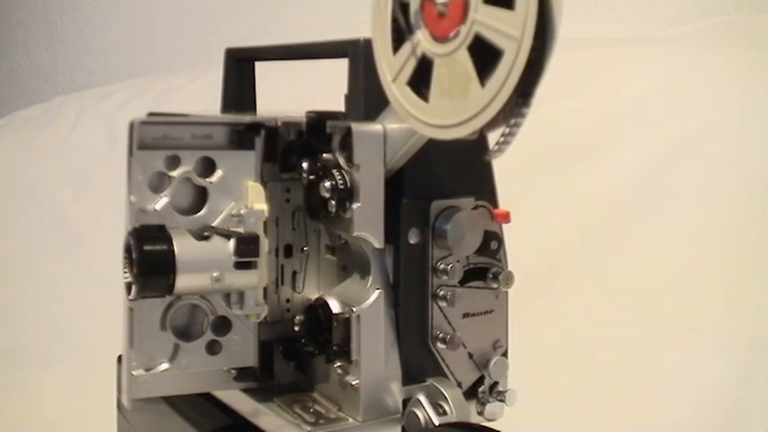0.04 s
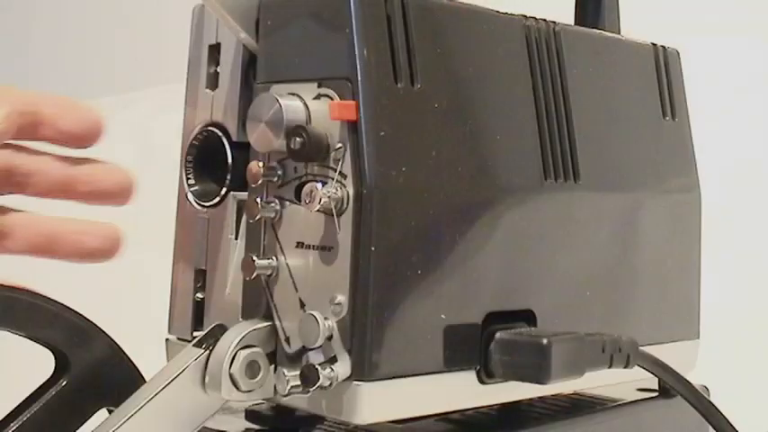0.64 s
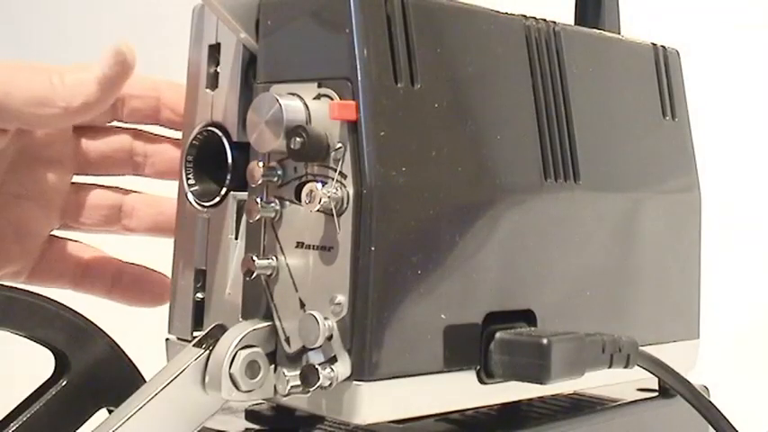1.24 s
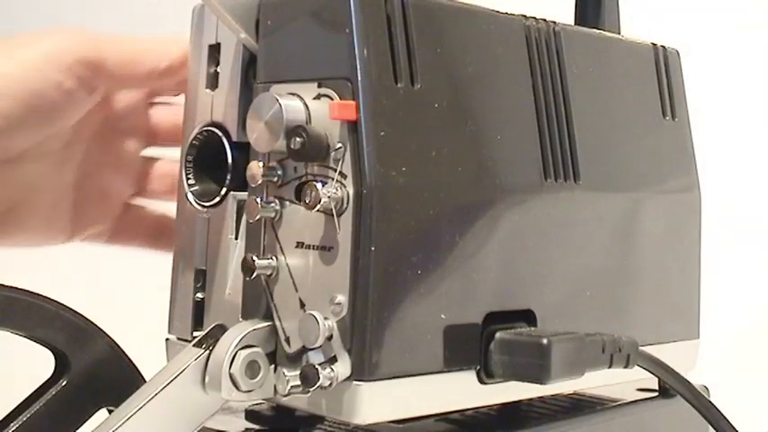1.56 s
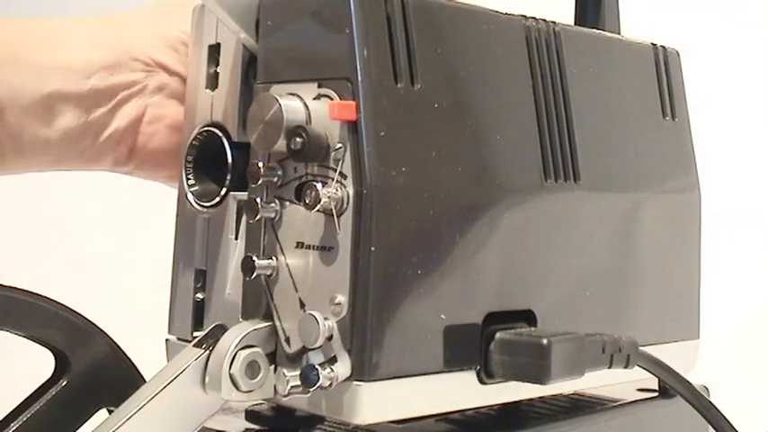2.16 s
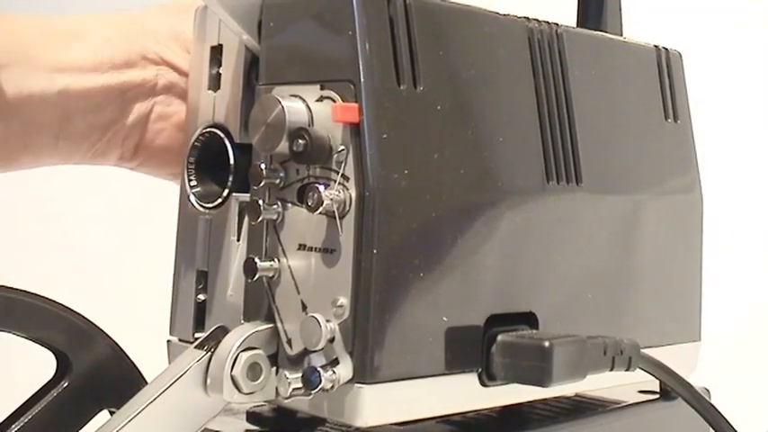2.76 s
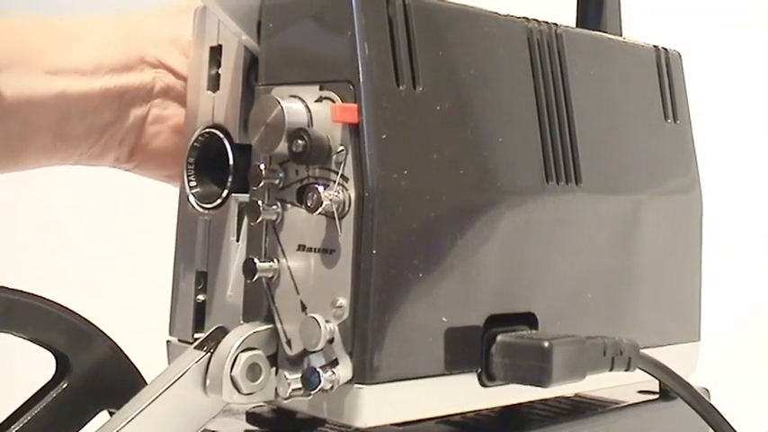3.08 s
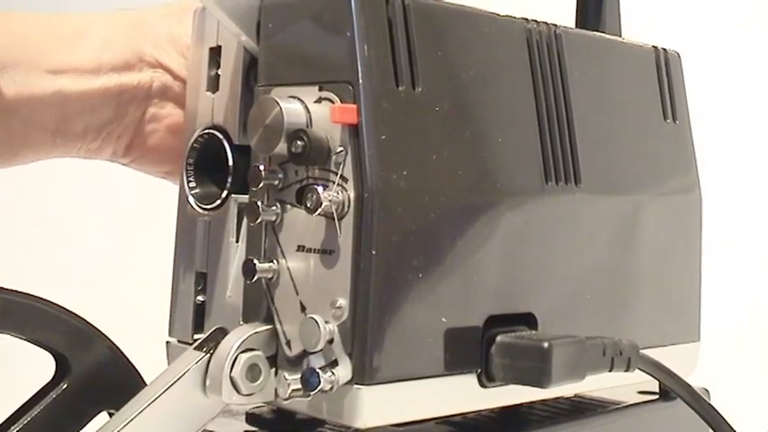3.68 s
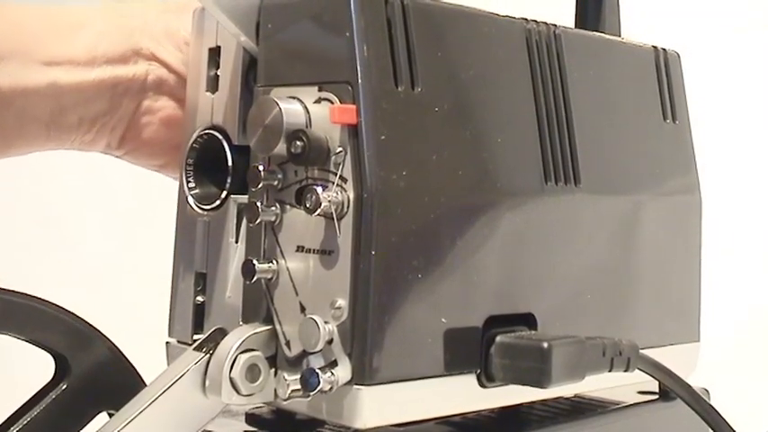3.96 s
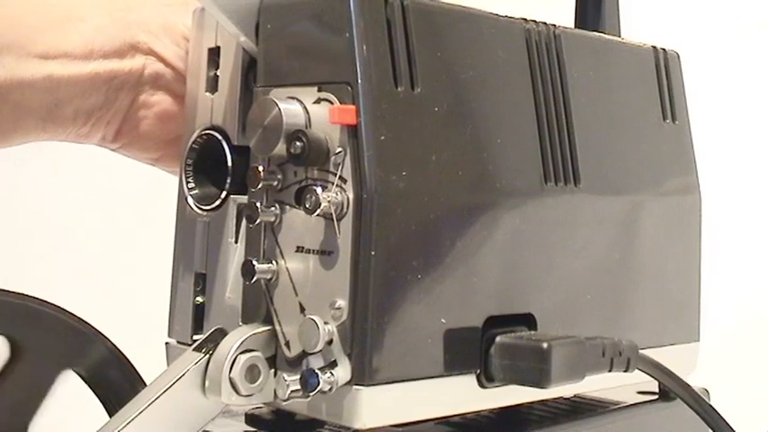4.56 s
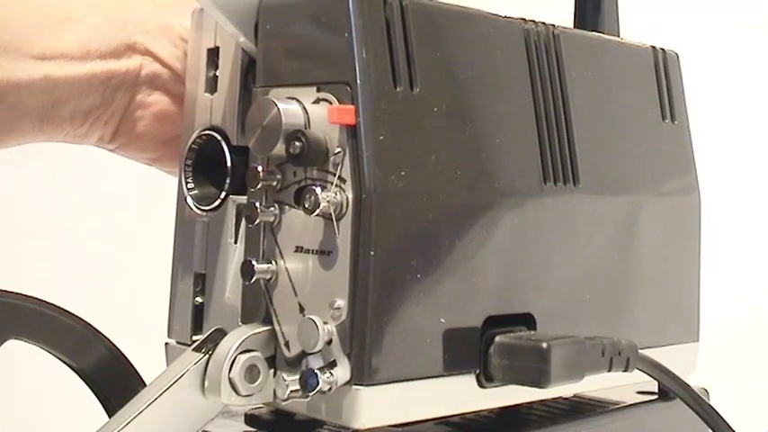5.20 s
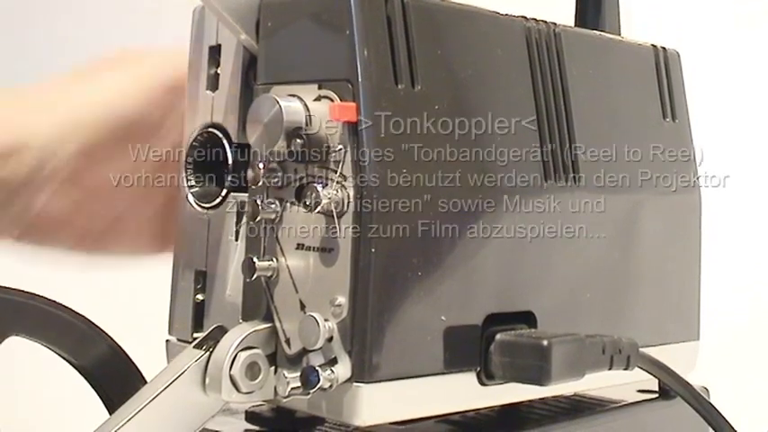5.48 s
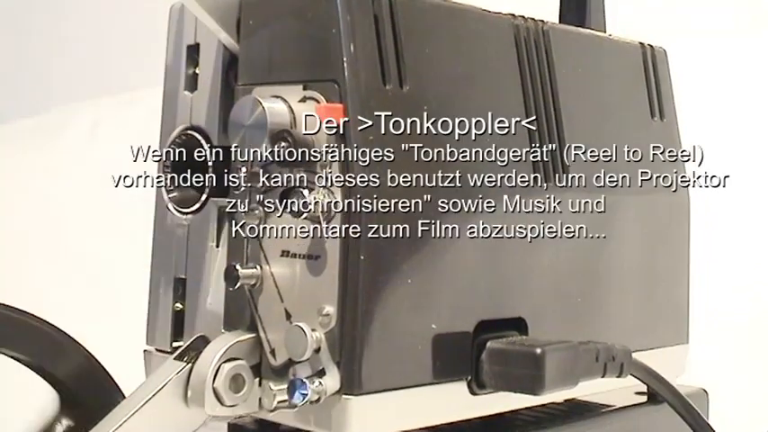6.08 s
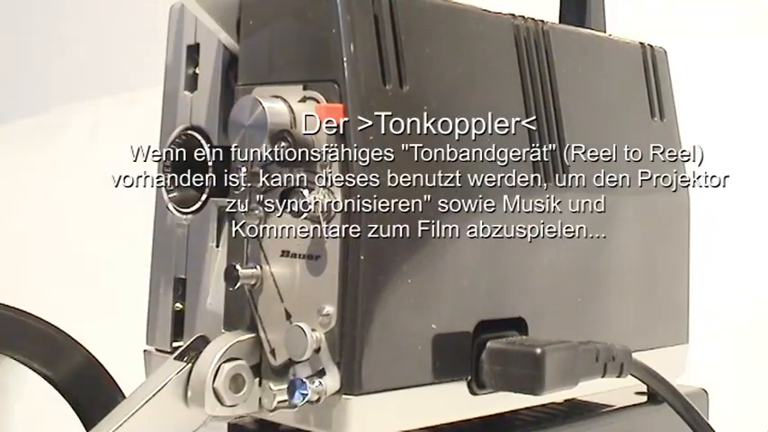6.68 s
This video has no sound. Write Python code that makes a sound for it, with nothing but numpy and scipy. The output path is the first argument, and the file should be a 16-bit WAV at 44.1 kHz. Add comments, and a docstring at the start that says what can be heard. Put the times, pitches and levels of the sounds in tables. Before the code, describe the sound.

A small film projector stands close by, a little to the right, in a quiet room. A few very faint touches on its case come first, then a crisp switch click. The machine starts at once and keeps running with a fast, even, pinging clatter over a motor hum and fan whirr. A brief low rubbing groan comes soon after the start, with a crisp film rustle around it and again near the end.

```python
"""Film projector starting up

In a quiet room, a hand brushes along a small projector's case and snaps the switch on. The motor
whines up to speed, and the claw strikes twice a frame, ticking, pinging and ringing the film gate
over the whirr of fan and gears. Something rubs against the case and groans once. The film rustles
over its guides around the groan, and again towards the end."""
import sys
import numpy as np
from scipy import signal
from scipy.fft import rfft, irfft
from scipy.io import wavfile
from scipy.ndimage import uniform_filter1d

SR = 44100
rng = np.random.default_rng(int(sys.argv[2]) if len(sys.argv) > 2 else 0)


def persist_wave(psi):
    """Save psi, clipped to +-1, as 16-bit WAV."""
    counts = np.round(np.clip(psi, -1, 1) * 32767).astype(np.int16)
    wavfile.write(sys.argv[1], SR, np.atleast_2d(counts).T)


N = 301644
T = np.arange(N) / SR
HZ = np.fft.rfftfreq(N, 1 / SR)


def amp(db):
    """Decibels to gain."""
    return 10 ** (np.asarray(db) / 20)


def unit_rms(x):
    """Scales to rms 1."""
    return x / np.sqrt(np.mean(x ** 2) + 1e-20)


def spectrum(points):
    """A frequency table's value at every frequency."""
    hz, value = np.transpose(points)
    return np.interp(np.log(HZ + 1), np.log(hz + 1), value)


def peaks(rows):
    """Bell-shaped resonances as an EQ curve in dB."""
    return sum(db / (1 + (2 * (HZ - hz) / width) ** 2) for hz, width, db in rows)


def curves(rows):
    """The columns of a time table at every sample."""
    times, *columns = np.transpose(rows)
    return [np.interp(T, times, column) for column in columns]


def add(mix, s, sound):
    """Mixes a sound in at time s."""
    part = mix[..., round(s * SR):][..., :sound.shape[-1]]
    part += sound[..., :part.shape[-1]]


def eq(x, db):
    """Filters by a gain at every frequency."""
    return irfft(rfft(x) * amp(db), N)


def strike(t, rise, decay):
    """Envelope of a blow."""
    return (1 - np.exp(-t / rise)) * np.exp(-t / decay)


def grain(samples):
    """Smoothed noise at rms 1, for roughening a level."""
    return unit_rms(uniform_filter1d(rng.standard_normal(N), size=samples))


# Stereo focus of the projector: (frequency [Hz], left-right correlation [-1 to 1])
PROJECTOR_FOCUS = [(60, 0.66), (130, 0.67), (290, 0.27), (640, 0.6), (1410, 0.71), (3100, 0.99),
                   (6820, 0.75), (15000, 0.037)]

def noise(db, focus=PROJECTOR_FOCUS):
    """Coloured stereo noise whose mono mix has rms 1."""
    a, b = rfft(rng.standard_normal((2, N)))
    correlation = np.clip(spectrum(focus), -.8, 1)
    mid, side = a * np.sqrt(1 + correlation), b * np.sqrt(1 - correlation)
    pair = irfft(np.array([mid + side, mid - side]) * amp(db) / np.sqrt(1 + correlation), N)
    return pair / pair.mean(0).std()


def reverb(x, t60, wet_db):
    """Adds a small room's scattered reflections, different left and right."""
    t = T[:SR // 2]
    taps = rng.choice([-1., 1.], (2, len(t))) * (rng.random((2, len(t))) < .1)
    taps *= (t > .004) * amp(-60 * t / t60)
    taps /= np.linalg.norm(taps, axis=1, keepdims=True)
    return x + amp(wet_db) * signal.fftconvolve(x, taps, axes=1)[:, :N]


# Colours of the opening hiss and the quiet bed: (frequency [Hz], gain [dB])
OPENING_EQ = [(15, -37), (25, -8), (71, -10), (112, -3), (271, -12), (394, -7.5), (729, -10.5), (1420, -9),
              (1720, -11.5), (3010, -12), (5720, -13), (7890, -21.5), (15000, -26)]
BED_EQ = [(20, -12), (70, -6.5), (118, 1), (170, -7), (400, -6), (800, -7), (1200, -7.5), (1480, -5),
          (1750, -9), (4600, -8), (5900, -10.5), (6700, -14), (8200, -19.5), (15000, -23)]
# The opening hiss drops away; the bed comes in and dips briefly: (time [s], gain [dB])
OPENING_FADE = [(0, 0.5), (.3, 0.5), (.47, -3.5), (.485, -26)]
BED_FADE = [(.47, -21), (.485, -1.5), (.515, -6), (.53, 0.5), (3.2, 0)]
# Resonances in both: (frequency [Hz], width [Hz], gain [dB])
HISS_PEAKS = [(111, 24, 2), (1466, 99, 5.5), (5500, 140, 7), (5750, 124, 8), (6030, 120, 3.5)]
# Stereo focus of the room: (frequency [Hz], left-right correlation [-1 to 1])
ROOM_FOCUS = [(60, -0.63), (130, -0.75), (290, -0.79), (640, -0.6), (1410, 0.17), (3100, 0.44),
              (6820, 0.26), (15000, -0.19)]

def room_tone(opening_db=-59.5, bed_db=-65.5, hum_hz=120, hum_db=-81.5):
    """A wide hiss, louder for the first half second, and a faint hum."""
    opening = noise(spectrum(OPENING_EQ) + peaks(HISS_PEAKS), ROOM_FOCUS)
    opening *= amp(opening_db + curves(OPENING_FADE)[0])
    bed = noise(spectrum(BED_EQ) + peaks(HISS_PEAKS), ROOM_FOCUS)
    bed *= amp(bed_db + curves(BED_FADE)[0])
    hum = amp(hum_db) * np.sqrt(2) * np.sin(2 * np.pi * hum_hz * T)
    return opening + bed + hum


# Touches on the case: (time [s], level [dB], pitch [Hz], decay [s], bandwidth [share of pitch])
TOUCHES = [(.734, -71, 8000, .012, .3), (.847, -58.5, 2800, .012, .8), (.877, -62, 1800, .012, 0.54),
           (0.944, -56.5, 335, 0.018, 0.1), (.945, -56, 1260, 0.0092, 0.88), (0.995, -63, 600, 0.015, 1),
           (1.148, -60.5, 1100, 0.0089, 0.98), (1.422, -65, 700, .012, .9)]
# Slides along it: (time [s], length [s], level [dB])
SLIDES = [(.52, 0.76, -80), (1.36, 0.25, -75.5), (2.28, 0.62, -73.5)]
# Their dull resonance: (frequency [Hz], width [Hz], gain [dB])
SLIDE_PEAK = [(382, 230, 34)]

def hand():
    """Soft touches, each a puff of noise around one pitch, and faint slides along the case."""
    touches, sliding = np.zeros((2, N))
    t = T[:SR // 8]
    for s, db, hz, decay, width in TOUCHES:
        band = signal.iirpeak(hz, 1 / width, fs=SR)
        puff = unit_rms(signal.filtfilt(*band, rng.standard_normal(len(t)), padtype=None))
        add(touches, s, amp(db) * strike(t, 0.00087, decay) * puff)
    for s, length, db in SLIDES:
        add(sliding, s, amp(db) * np.hanning(round(length * SR)))
    return touches + sliding * noise(peaks(SLIDE_PEAK))


# Switch clicks: (time [s], level [dB], snap decay [s], brightness [0 to 1])
CLICKS = [(3.259, -36, 0.0062, 0.55), (3.279, -40.5, 0.0056, 0.82), (3.336, -38, 0.0045, 0.77),
          (3.3396, -22.5, 0.0058, 1), (3.350, -37, 0.0038, 0.94), (3.3605, -51, 0.0093, 1)]
# Colours of the bright snap and the panel's dull clack: (frequency [Hz], gain [dB])
SNAP_EQ = [(100, -29), (600, -23), (1010, 2), (1700, -3.5), (2900, 2.5), (3400, -7), (3900, -1),
           (4400, -5.5), (5400, 1.5), (6400, -0.5), (8000, -11.5), (11000, -22), (15000, -30)]
CLACK_EQ = [(30, -18), (120, -7), (400, 2), (1300, -4.5), (3400, -0.5), (5000, -10), (10000, -27)]
# Panel resonances: (frequency [Hz], width [Hz], gain [dB])
PANEL_PEAKS = [(86, 18, 15), (170, 50, -3), (781, 90, 15), (1000, 58, 14.5), (1900, 500, 13),
               (3050, 180, 11.5)]

def switch(snap_rise_s=0.00021):
    """The knob leaves its detent, then the contact snaps home and rattles; each blow clacks the panel."""
    t = T[:SR // 5]
    snaps, clacks = np.zeros((2, N))
    attack = 1 - np.exp(-t / snap_rise_s)
    for s, db, decay, bright in CLICKS:
        bright = min(bright, .99)
        add(snaps, s, amp(db) * bright * attack * np.exp(-(t / decay) ** 2))
        add(clacks, s, amp(db) * np.sqrt(1 - bright ** 2) * strike(t, rise=0.0007, decay=0.02))
    clicks = snaps * noise(spectrum(SNAP_EQ)) + clacks * noise(spectrum(CLACK_EQ) + peaks(PANEL_PEAKS))
    return reverb(clicks, t60=0.33, wet_db=-14)


# Thin colour of the detent spring: (frequency [Hz], gain [dB])
SPRING_EQ = [(1500, -30), (3400, 0), (8000, -7), (11000, 2), (15000, -6)]

def detent(level_db=-47):
    """The spring ticks brightly with the first two clicks of the knob."""
    envelope = np.zeros(N)
    for s, *_ in CLICKS[:2]:
        add(envelope, s, amp(level_db) * strike(T[:SR // 20], rise=.0002, decay=.004))
    return envelope * noise(spectrum(SPRING_EQ))


POWER_ON_S, FIRST_STROKE_S, RUNNING_FPS = 3.338, 3.419, 16.9
# Film speed, which times the claw and pitches motor and gears: (time [s], rate [frames/s])
FILM_SPEED = [(3.35, 7.938), (3.5, 16.928), (4.2, 16.981), (4.65, 16.769), (5.1, 16.892), (5.8, 16.866),
              (5.87, 16.508), (5.98, 17.025), (6.84, 17.067)]

def speed():
    """The drive's speed as a share of its running speed."""
    return curves(FILM_SPEED)[0] / RUNNING_FPS


def frames():
    """Frames of film moved since the claw's first stroke."""
    count = np.cumsum(speed()) * RUNNING_FPS / SR
    return count - np.interp(FIRST_STROKE_S, T, count)


def stroke_times():
    """The claw strikes every half frame, in and out by turns."""
    count = frames()
    return np.interp(np.arange(0, count[-1], .5), count, T)


def drive_gain(trim_db=.5, db_per_octave=10.5, db_per_s=0.3):
    """The drive gets louder with speed, and creeps up as it runs on."""
    db = trim_db + db_per_octave * np.log2(speed()) + db_per_s * (T - POWER_ON_S)
    return amp(db) * (T > POWER_ON_S)


# Mains hum, strongest while the motor starts: (time [s], level [dB])
MOTOR_HUM = [(3.335, -95), (3.36, -57), (3.5, -52), (3.62, -61.5), (5.8, -61.5), (6.2, -65), (6.84, -65)]

def motor(whine_hz=559.7, whine_db=-52.5, db_per_octave=32, waver=0.0017, hum_hz=100):
    """A wavering whine that climbs and swells with speed, over the hum of the windings."""
    wander = noise(spectrum([(8, 5), (40, -29), (200, -90)]))[0]
    cycles = np.cumsum(whine_hz * speed() * (1 + waver * wander)) / SR
    whine = amp(whine_db + db_per_octave * np.log2(speed())) * np.sin(2 * np.pi * cycles)
    hum = amp(curves(MOTOR_HUM)[0]) * np.sin(2 * np.pi * hum_hz * T)
    return np.sqrt(2) * (whine + hum) * (T > POWER_ON_S)


# Colour of fan and gears: (frequency [Hz], gain [dB])
WHIRR_EQ = [(20, -36), (48, -12.5), (62, -28), (88, -4), (125, -11), (270, -6.5), (350, -8.5), (620, 0.2),
            (1200, -6.5), (2400, 0.5), (4200, -10.5), (6200, -11.5), (8400, -27), (15000, -41)]
# Case resonances: (frequency [Hz], width [Hz], gain [dB])
CASE_PEAKS = [(85.02, 15, 2.5), (180, 24, 5), (298, 87, 4.5), (766.5, 56, 8), (940, 83, 6),
              (1014, 41, 10.5), (1352, 135, 7), (1530, 54, -4), (2994, 174, 14), (3260, 49, -3),
              (3600, 57, 7.5), (4290, 54, 6.5), (5460, 160, -1), (6240, 130, 3.5)]

def whirr(air_db=-47.5, rattle_db=-49.5, throb_db=1.4, grit_db=1.5):
    """Fan air and a gear rattle that comes round every frame, both sounding through the case."""
    colour_db = spectrum(WHIRR_EQ) + peaks(CASE_PEAKS)
    one_turn = rng.standard_normal(round(SR / RUNNING_FPS))
    rattle = np.zeros(N)
    for s in stroke_times()[::2]:
        add(rattle, s, one_turn)
    # the rattle has a slightly softer top than the air
    rattle = eq(rattle, colour_db + spectrum([(1400, -1.5), (3000, -1), (6000, -3.5)]))
    rattle /= rattle[T > FIRST_STROKE_S].std()
    load = np.cos(2 * np.pi * (2 * frames() - .25))  # one throb per claw stroke
    envelope = drive_gain() * amp(throb_db * load + grit_db * grain(samples=130))
    return envelope * (amp(air_db) * noise(colour_db) + amp(rattle_db) * rattle)


# Gear tones: (pitch at running speed [Hz], relative level cold [dB], relative level warm [dB])
GEAR_TONES = [(188, -76, -72), (614, -63, -64.5), (780, -61.5, -71), (776, -78, -61.5), (916, -72, -64.5),
              (1009, -59, -66.5), (1344, -78, -58.5)]

def gear_tones(warm_from_s=4.1, warm_by_s=6.37, sway_rad=0.097):
    """Meshing teeth sing in step with the film's speed; their balance shifts as the drive warms up."""
    run_s = frames() / RUNNING_FPS
    warmth = np.interp(T, [warm_from_s, warm_by_s], [0, 1])
    sway = sway_rad * noise(spectrum([(10, -8), (60, -31), (300, -92)]))[0]
    tones = np.zeros(N)
    for hz, cold_db, warm_db in GEAR_TONES:
        level = amp(cold_db + (warm_db - cold_db) * warmth)
        tones += level * np.sin(2 * np.pi * (hz * run_s + rng.random()) + sway)
    return np.sqrt(2) * tones * drive_gain()


def squeak(start_s=3.405, length_s=0.046, level_db=-52, pitch_hz=5600, width_hz=300):
    """The mechanism chirps faintly as it starts to turn."""
    envelope = np.zeros(N)
    add(envelope, start_s, amp(level_db) * np.hanning(round(length_s * SR)))
    band_db = -20 * np.log10(1 + (2 * (HZ - pitch_hz) / width_hz) ** 2)
    return envelope * noise(band_db)


# How the claw meets the film going in, and coming out half a frame later:
# (time [s], relative ping level [dB], ping pitch [Hz], relative tick level [dB])
CLAW_IN = [(3.42, -44, 2400, -51), (3.49, -30, 2270, -46.5), (3.67, -40, 2370, -45.5),
           (3.89, -42.5, 2420, -47), (4.22, -31.5, 2300, -42.5), (4.48, -34, 2320, -45),
           (4.84, -48, 2460, -42.5), (4.98, -33.5, 2287, -46), (5.3, -28, 2340, -43.5),
           (5.39, -42, 2320, -47), (5.55, -33, 2320, -45), (5.63, -39, 2710, -44.5), (5.85, -40, 2430, -46),
           (6.05, -32.5, 2370, -45), (6.25, -32.5, 2340, -40), (6.4, -32, 2410, -47),
           (6.68, -36.5, 2210, -43.5), (6.82, -47, 2240, -50)]
CLAW_OUT = [(3.45, -34, 2070, -59), (3.58, -40, 2200, -51.5), (3.72, -35.5, 2310, -46),
            (3.93, -32, 2115, -54), (4.22, -29, 2196, -48.5), (4.32, -30.5, 2440, -51),
            (4.57, -32, 2404, -45), (4.66, -30.5, 2374, -42), (5.1, -29, 2383, -41),
            (5.4, -31, 2430, -49.5), (5.68, -33, 2446, -41), (5.83, -29.5, 2396, -39),
            (5.9, -32.5, 2210, -44), (6.06, -36, 2330, -42), (6.42, -44, 2470, -44.5),
            (6.54, -31, 2400, -42), (6.84, -29.5, 2250, -47.5)]
# Spells when every other stroke knocks hard: (time [s], length [s], ping boost [dB])
KNOCKING = [(4.76, .39, 7), (5.709, .15, 8), (6.154, .15, 6)]

def strokes(ping_scatter_db=1.7, pitch_scatter=0.022, tick_scatter_db=1.5):
    """Yields each claw stroke's time, ping level, pitch and tick level, no two quite alike."""
    times = stroke_times()
    boost_db = np.zeros(len(times))
    for start, length, db in KNOCKING:
        first, end = np.argmin(abs(times - start)), np.searchsorted(times, start + length)
        boost_db[first:end:2] = db
    scatter = rng.standard_normal((len(times), 3)) * [ping_scatter_db, pitch_scatter, tick_scatter_db]
    for k, (s, (ping_offset, detune, tick_offset)) in enumerate(zip(times, scatter)):
        at, *columns = np.transpose(CLAW_OUT if k % 2 else CLAW_IN)
        ping_db, hz, tick_db = (np.interp(s, at, column) for column in columns)
        yield s, ping_db + boost_db[k] + ping_offset, hz * (1 + detune), tick_db + tick_offset


# Modes of the film gate: (frequency [Hz], relative level [dB], time to fall 60 dB [s])
GATE_MODES = [(1543, -15, 0.046), (2089, -5, 0.042), (2339, -8, 0.077), (2640, -3, 0.032),
              (3020, -20, 0.19), (3620, -21, 0.03), (5400, -15, 0.037), (6240, -23.5, 0.034)]

def gate_ring(t, scatter_db=3):
    """The gate's modes ring out, struck a little differently every time."""
    ring = np.zeros(len(t))
    for hz, db, t60 in GATE_MODES:
        envelope = amp(db + scatter_db * rng.standard_normal() - 60 * t / t60)
        ring += envelope * np.sin(2 * np.pi * (hz * t + rng.random()))
    return ring


# Colour of the claw's tick: (frequency [Hz], gain [dB])
TICK_EQ = [(600, -2.5), (1500, -22), (2500, 8), (3600, 12), (4300, -2.5), (5500, 8.5), (6500, -1.5),
           (8300, -13.5), (10200, -10), (12000, -28), (15000, -47)]

def claw(ping_gain_db=7, gate_gain_db=-14.6, tick_gain_db=7.5, rise_s=0.00051, ping_s=0.0046,
         bounce_s=0.00331, bounce_share=0.51, rebound_db=-39, case_share=0.26):
    """Each stroke ticks, pings the sprung claw until the film damps it, and rings the gate."""
    t = T[:SR // 12]
    pings, ticks = np.zeros((2, N))
    attack = (1 - np.exp(-t / rise_s)) ** 2
    damped = attack * np.exp(-(t / ping_s) ** 2)
    for s, ping_db, hz, tick_db in strokes():
        add(pings, s, amp(ping_db + ping_gain_db) * damped * np.sin(2 * np.pi * hz * t))
        # the gate takes up less than its share of a hard blow
        add(pings, s, amp(gate_gain_db + .5 * ping_db) * attack * gate_ring(t))
        tick = amp(tick_db + tick_gain_db) * strike(t, rise=0.00014, decay=0.0028)
        add(ticks, s - .0003, tick)
        # the claw bounces once, with a random delay, strength and pitch
        bounce_at = s + bounce_s * (.5 + rng.random())
        strength = rng.random()
        rebound_hz = hz * (1 + 0.13 * rng.uniform(-0.89, 1))
        add(ticks, bounce_at, bounce_share * strength * tick)
        add(pings, bounce_at, amp(rebound_db) * strength * damped * np.sin(2 * np.pi * rebound_hz * t))
    tick_noise = noise(spectrum(TICK_EQ) + case_share * peaks(CASE_PEAKS))
    return reverb(pings + ticks * tick_noise, t60=0.2, wet_db=-16)


# Film rustles: (time [s], relative level [dB], length [s])
RUSTLES = [(4.465, -56, 0.053), (4.81, -61, 0.11), (4.437, -55.5, 0.71), (6.245, -55.5, 0.2),
           (6.343, -61, 0.024), (6.365, -50, 0.023), (6.461, -51, .022), (6.496, -48, 0.023),
           (6.566, -54, 0.028), (6.751, -42, 0.077), (6.782, -42, 0.015)]
# Their crisp colour: (frequency [Hz], gain [dB])
FILM_EQ = [(1500, -21), (3500, -9), (4700, 5), (6700, 6), (8500, -10), (11000, -11.5), (15000, -35)]

def film_rustle(swish_db=2, grain_db=4, crackle_db=-4, catches_per_s=220):
    """Grainy swishes of film sliding over its guides, with tiny snaps as its edge catches."""
    envelope = np.zeros(N)
    for s, db, length in RUSTLES:
        add(envelope, s, amp(db) * np.hanning(round(length * SR)))
    roughness_db = grain_db * grain(samples=50)
    catches = np.minimum(rng.exponential(1, N), 3) * (rng.random(N) < catches_per_s / SR)
    snaps = unit_rms(signal.fftconvolve(catches, strike(T[:SR // 100], rise=.0001, decay=.0016))[:N])
    swish = amp(swish_db + roughness_db) * noise(spectrum(FILM_EQ))
    crackle = amp(crackle_db) * snaps * noise(spectrum(FILM_EQ))
    return envelope * (swish + crackle)


# Contour of the groan: (time [s], pitch [Hz], relative level [dB])
GROAN = [(4.46, 276, -78), (4.495, 282.5, -50), (4.56, 279, -60.5), (4.665, 277.3, -60),
         (4.69, 262.5, -42.5), (4.74, 269.3, -39.5), (4.78, 275, -42), (4.805, 258, -48), (4.87, 258, -67)]
# Colour of the scrape under it: (frequency [Hz], gain [dB])
SCRAPE_EQ = [(30, -30), (80, 6), (130, -10), (290, 5.5), (360, -6), (460, 5.5), (620, -11), (800, -1),
             (1100, -13), (3000, -50)]

def groan(tone_db=-1, scrape_db=-2.5, roughness=.025):
    """Stick and slip against the case: a rough low note over a scrape."""
    hz, db = curves(GROAN)
    jitter = noise(spectrum([(60, 2), (300, -29), (1000, -84)]))[0]
    phase = 2 * np.pi * np.cumsum(hz * (1 + roughness * jitter)) / SR
    tone = unit_rms(np.sin(phase) + amp(-20) * np.sin(2 * phase) + amp(-12) * np.sin(3 * phase))
    rubbing = (T > GROAN[0][0]) * (T < GROAN[-1][0])
    return amp(db) * rubbing * (amp(tone_db) * tone + amp(scrape_db) * noise(spectrum(SCRAPE_EQ)))


def pan(pair, balance):
    """Leans a stereo pair left or right, frequency by frequency."""
    lean_db = np.array([spectrum(balance), -spectrum(balance)]) / 2
    return eq(pair, lean_db - 20 * np.log10(amp(lean_db).mean(0)))


# Stereo balance of projector and room: (frequency [Hz], left minus right [dB])
PROJECTOR_PAN = [(60, -2), (110, -13), (200, -8), (380, -7), (700, -3.5), (1290, -1), (2380, -2.0),
                 (4400, -3), (8120, -1.5), (15000, 0.5)]
ROOM_PAN = [(60, -1), (110, -2.5), (200, 0), (380, -0.5), (700, 0.5), (1290, -1.5), (2380, -2.0),
            (4400, -3.5), (8120, 0), (15000, -1)]

def scene():
    """The projector, a little to the right, in the quiet room."""
    running = claw() + whirr() + gear_tones() + motor()
    projector = running + switch() + detent() + squeak() + groan() + film_rustle() + hand()
    return pan(projector, PROJECTOR_PAN) + pan(room_tone(), ROOM_PAN)


def record(dry):
    """A steep low-pass takes off the very top."""
    lowpass = signal.firwin(401, cutoff=15300, window=("kaiser", 8), fs=SR)
    return signal.oaconvolve(dry, lowpass[None], "same")


dry = scene()
out = record(dry)
persist_wave(out)
```